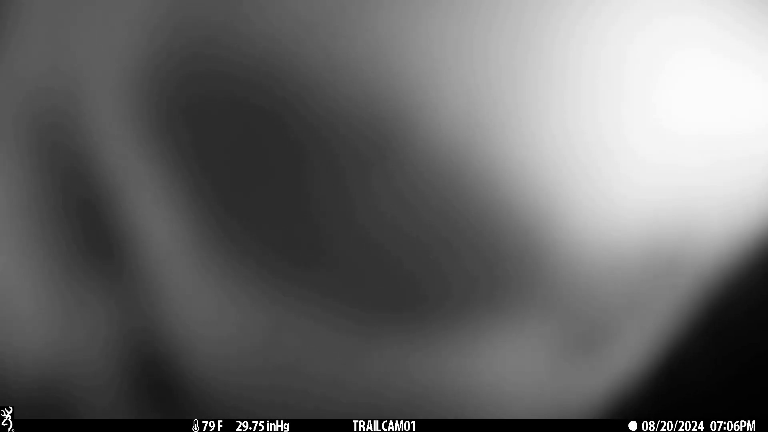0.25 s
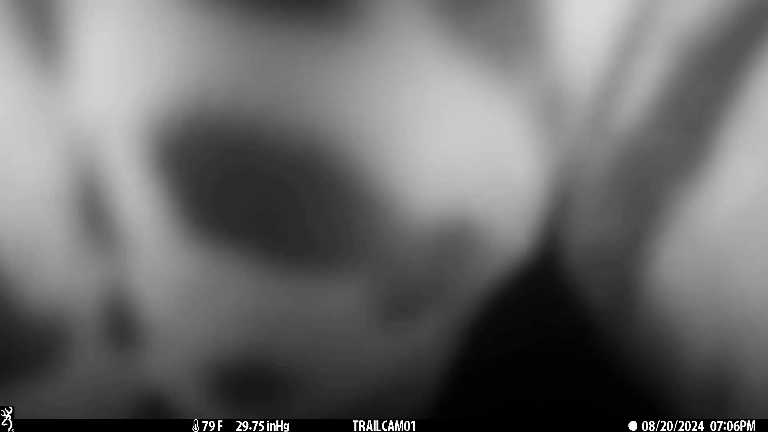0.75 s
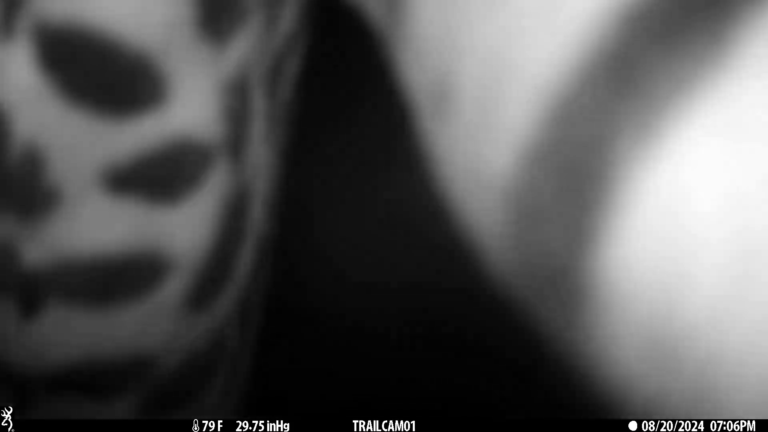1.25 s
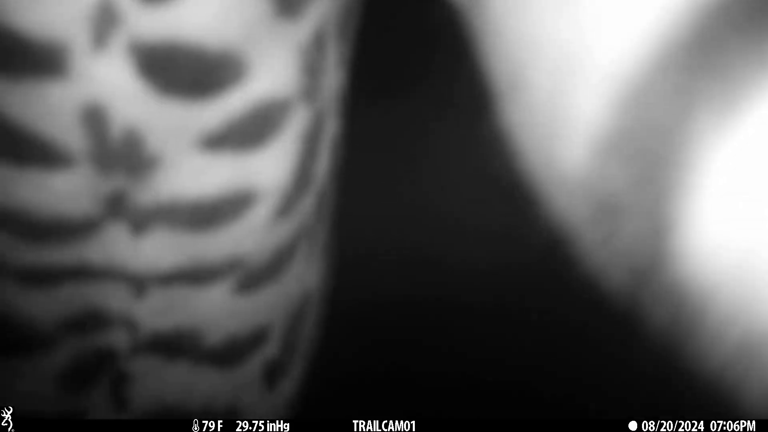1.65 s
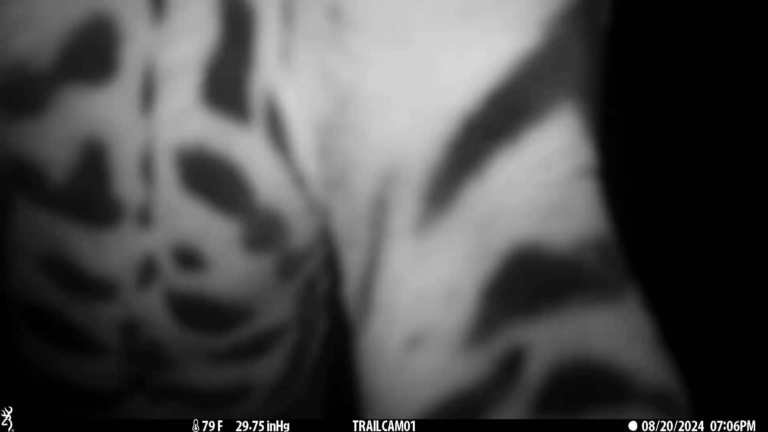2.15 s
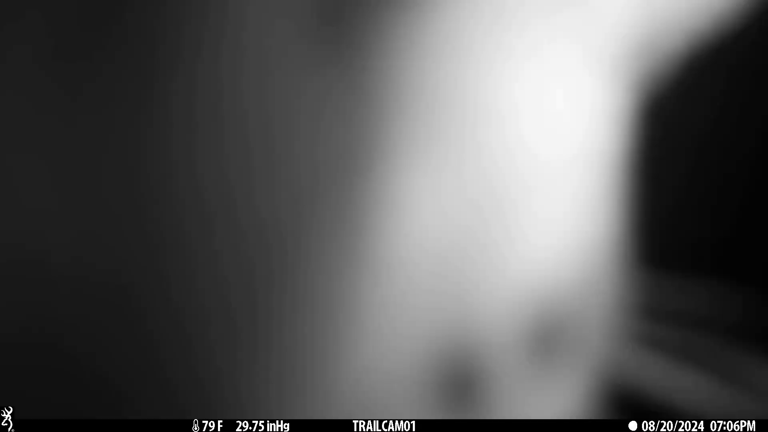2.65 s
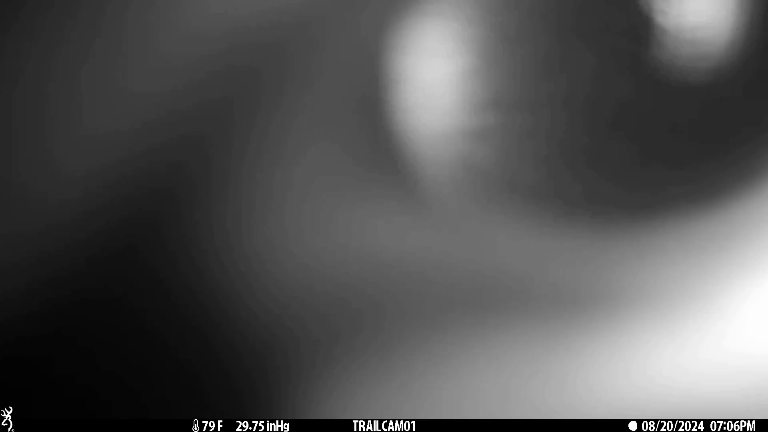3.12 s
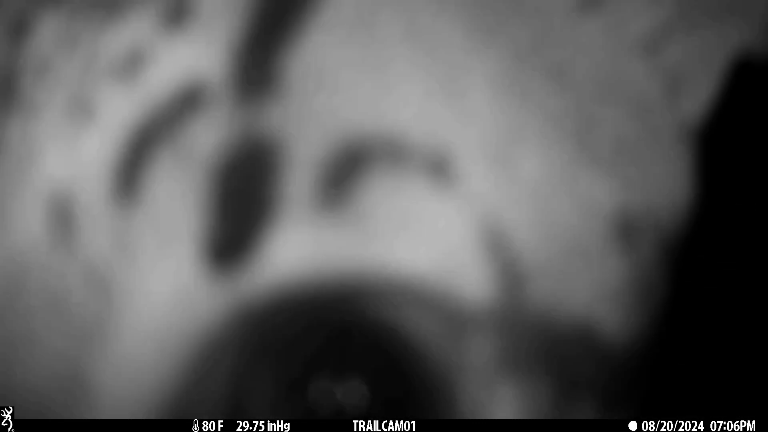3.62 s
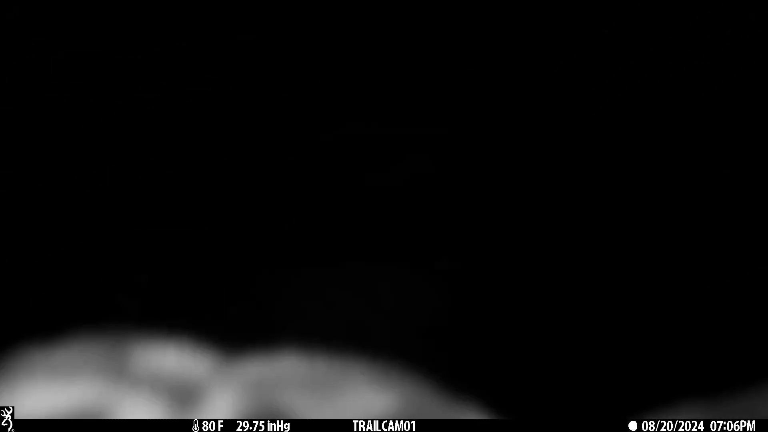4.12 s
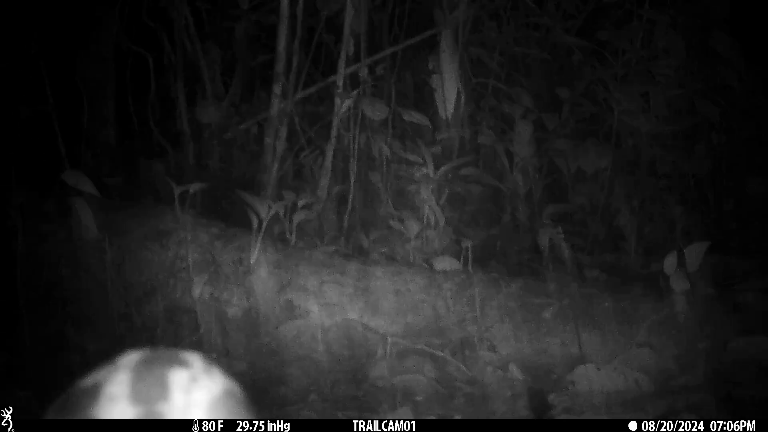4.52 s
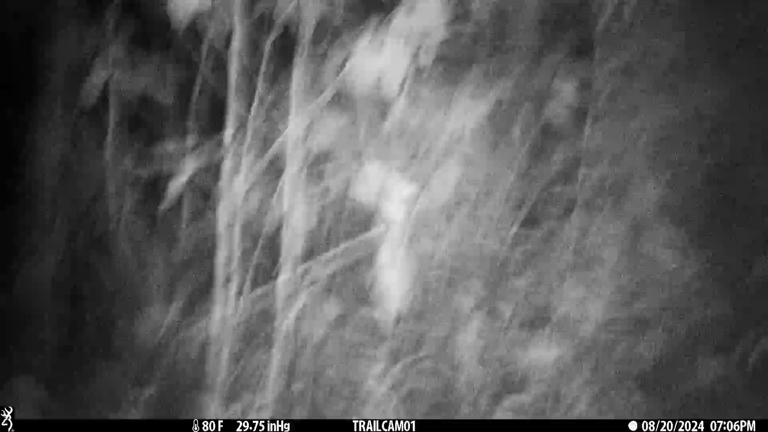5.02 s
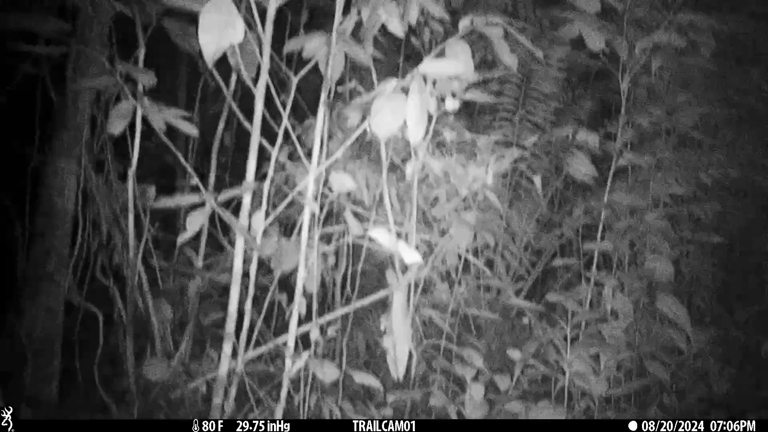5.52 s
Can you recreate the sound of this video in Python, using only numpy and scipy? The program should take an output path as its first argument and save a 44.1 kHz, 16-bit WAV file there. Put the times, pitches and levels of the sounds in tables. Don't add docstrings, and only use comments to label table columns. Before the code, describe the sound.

Close, dry rubbing, clicks and hollow knocks on a plastic shell come in bursts over a steady hiss and shrill night insects.

```python
import sys
import numpy as np
from scipy import signal
from scipy.io import wavfile
from scipy.ndimage import uniform_filter1d

SR = 44100
rng = np.random.default_rng(int(sys.argv[2]) if len(sys.argv) > 2 else 0)


def amp(db):
    return 10 ** (np.asarray(db, float) / 20)


def write(x):
    x = np.atleast_2d(x).T
    wavfile.write(sys.argv[1], SR, np.round(np.clip(x, -1, 1) * 32767).astype(np.int16))


N = 254456


def evened(x):
    return x / np.sqrt(np.mean(x ** 2) + 1e-20)


def add(mix, start_s, sound):
    part = mix[round(start_s * SR):][:len(sound)]
    part += sound[:len(part)]


def resonate(x, hz, width_hz):
    r = np.exp(-np.pi * width_hz / SR)
    pole = r * np.exp(2j * np.pi * hz / SR)
    return 2 * signal.lfilter([1 - r], [1, -pole], x).real


def ring(x, modes):
    out = 0
    for k, (hz, width_hz, db) in enumerate(modes):
        mode = resonate(resonate(x, hz, width_hz), hz, width_hz)
        out = out + (-1) ** k * amp(db) / np.sqrt(width_hz) * mode
    return out


def glide(x, hz, width_hz):
    turn = np.exp(2j * np.pi * np.cumsum(hz) / SR)
    r = np.exp(-np.pi * width_hz / SR)
    return (turn * signal.lfilter([(1 - r) ** 2], [1, -2 * r, r * r], x / turn)).real


def drift(n, size):
    return evened(uniform_filter1d(uniform_filter1d(rng.standard_normal(n), size), size))


FADE_DB, ROUND = 18, 1.41


def stroke(t, deepest_s, rise_s, fall_s, db):
    before = (deepest_s - t) / max(rise_s, .004)
    after = (t - deepest_s) / max(fall_s, .004)
    away = np.where(t < deepest_s, before, after)
    return amp(2 * (db - FADE_DB * np.minimum(away, 4) ** ROUND))


# (deepest [s], rise [s], fall [s], pressure [dB], rim re pressure [dB])
HEAD_RUBS = [(.4, 0.052, 0.066, -25.5, -9), (0.498, 0.048, 0.039, -26.5, -3.5),
             (.575, 0.05, 0.022, -30.5, -7), (.606, 0.019, .045, -24.5, -5), (.68, 0.16, 0.15, -32.5, -5),
             (1.02, 0.089, 0.024, -45.5, 8), (1.21, 0.059, 0.17, -34, -11), (1.27, 0.013, 0.036, -22.5, -8),
             (1.308, 0.0091, 0.032, -29.5, -3), (1.391, 0.021, 0.048, -17, -8),
             (1.418, 0.033, 0.022, -23, 0.5), (1.467, 0.025, .02, -23, -16),
             (1.492, 0.0083, 0.033, -42, -25), (1.956, 0.065, 0.05, -32, -5.5)]
FLANK_RUBS = [(2.98, 0.018, 0.053, -33.5, -5), (3.122, 0.01, 0.063, -33, 3),
              (3.951, 0.075, 0.047, -31, -6.5), (4.537, 0.0097, 0.017, -28, -4),
              (4.57, 0.013, 0.021, -35, -11), (4.65, 0.18, 0.18, -32.5, -2.5),
              (5.058, 0.017, .02, -25.5, -9), (5.091, 0.11, 0.071, -29.5, -5.5),
              (5.13, 0.11, 0.12, -30.5, -1.5), (5.373, 0.032, 0.019, -22, -2),
              (5.56, 0.048, 0.076, -19, -3), (5.66, 0.061, 0.18, -34, -5.5), (5.76, 0.14, 0.098, -33, -2)]
# (frequency [Hz], width [Hz], level [dB])
SHELL_MODES = [(2200, 350, -5.5), (2694, 1700, -6), (3220, 200, -7), (3587, 180, -5.5), (6460, 67, -20.5)]
# (frequency [Hz], width [Hz], level [dB])
RIM_MODES = [(4060, 430, 0), (4400, 400, -6), (5420, 3400, -12.5)]
# (frequency [Hz], width [Hz], level [dB])
BODY_MODES = [(1090, 410, 6), (1650, 310, 2), (670, 91, -10), (420, 64, -4.5)]
HEAD_PANEL_HZ, FLANK_PANEL_HZ, STIFFEN_HZ_PER_DB = 3170, 3053, 1.5
PANEL_DB_PER_DB = 0.36
BODY_DB, BODY_DB_PER_DB = -48, 1
RUMBLE_DB, RUMBLE_DB_PER_DB = -58.5, 1
LOOSE_S, TIGHT_DB, TIGHT_BODY_DB = 0.073, -21, -18
FUR_HZ, FUR_WIDTH_HZ, FUR_DB = 8840, 3300, -36.5
SWEEP_POWER = 1.2


def rubs():
    size = amp(2.2 * np.minimum(rng.exponential(1, N), 3))
    slips = size * rng.standard_normal(N) * (rng.random(N) < 9000 / SR)
    slips *= amp(.8 * drift(N, size=120)) / np.sqrt(uniform_filter1d(slips ** 2, size=900) + 1e-9)

    t = np.arange(0, N + 32, 32) / SR
    rows = HEAD_RUBS + FLANK_RUBS
    strokes = np.array([stroke(t, *row[:-1]) for row in rows])
    db = 10 * np.log10(strokes.sum(0) + 1e-12)
    rim = np.sqrt(amp(2 * np.array(rows)[:, -1]) @ strokes)
    lengths = np.array([(rise_s + fall_s) / .1 for _, rise_s, fall_s, *_ in rows])
    sweep = lengths ** SWEEP_POWER @ strokes
    tight = 1 - np.max([np.exp(-((t - s) / LOOSE_S) ** 2) for s, *_ in SHOVES], axis=0)
    curves = (t, db, rim, sweep, tight)
    t, db, rim, sweep, tight = (np.interp(np.arange(N) / SR, t, v) for v in curves)
    over_db = db + 33
    sweep_db = 10 * np.log10(sweep + 1e-12) + 33
    touch = 1 / (1 + amp(-2 * (db + 65)))

    panel_hz = np.where(t < FLANK_RUBS[0][0] - .5, HEAD_PANEL_HZ, FLANK_PANEL_HZ)
    panel_hz = panel_hz + STIFFEN_HZ_PER_DB * np.maximum(over_db, -20)
    shell = amp(PANEL_DB_PER_DB * np.clip(over_db - 3.5, -15, 0) - 3.0) * evened(ring(slips, SHELL_MODES))
    shell += 0.73 * evened(glide(slips, panel_hz, 370))
    body = amp(TIGHT_BODY_DB * tight) * ring(slips, BODY_MODES[:1] + BODY_MODES[2:])
    body -= ring(slips, BODY_MODES[1:2])
    rumble = resonate(resonate(slips, 122, 290), 122, 290)
    fur = evened(ring(rng.standard_normal(N), [(FUR_HZ, FUR_WIDTH_HZ, 0)]))

    parts = amp(db - 1.5) * shell
    parts += amp(-1.9) * rim * evened(ring(slips, RIM_MODES))
    parts += amp(BODY_DB + BODY_DB_PER_DB * over_db) * evened(body)
    parts += amp(RUMBLE_DB + RUMBLE_DB_PER_DB * over_db + TIGHT_DB * tight) * evened(rumble)
    parts += amp(FUR_DB - 34.5 + 0.64 * sweep_db) * fur
    return parts * touch


# (time [s], peak [dB], pitch [Hz], length [s])
SNAGS = [(0.388, -14, 3220, 0.0089), (0.425, -12, 3200, 0.0045), (0.4932, -18, 3300, 0.0074),
         (0.5133, -5, 3420, 0.0071), (0.572, -28, 2980, 0.0053), (0.597, -11, 3380, 0.0044),
         (0.6024, -9, 3170, 0.0096), (0.62, -24, 2900, 0.006), (1.168, -22, 3180, 0.012),
         (1.197, -16.5, 3180, 0.0098), (1.224, -22, 3150, .005), (1.265, -23, 3330, 0.006),
         (1.272, -12, 3220, 0.0086), (1.293, -5, 3220, 0.0069), (1.3012, -2, 3300, 0.0056),
         (1.385, -11, 3350, 0.0028), (1.3934, -4, 3400, 0.0044), (1.4006, -1, 3380, 0.011),
         (1.416, -3, 2960, 0.011), (1.4574, 2.5, 3950, 0.0023), (1.4605, 4, 3420, 0.006),
         (1.4675, -5, 3700, 0.0078), (1.492, -20, 3190, 0.01), (1.505, -28, 1100, 0.0036),
         (1.6244, -20.5, 3300, 0.0075), (1.664, -25.5, 2980, 0.0074), (1.929, -16.5, 3230, 0.0074),
         (1.939, -15, 3180, 0.0065), (1.956, -15.5, 3600, 0.017),
         (2.933, -18.5, 4160, 0.0035), (2.971, -21.5, 4150, 0.005), (3.115, -23, 2700, 0.015),
               (3.124, -20, 4160, 0.0068), (3.267, -28, 3120, 0.022), (3.898, -31, 1130, 0.087),
               (3.92, -22, 3480, 0.019), (3.931, -29, 1110, 0.034), (3.94, -18, 3300, 0.0098),
               (4.5098, -13.5, 4180, 0.0054), (4.514, -12.5, 2880, 0.01), (4.5234, -12, 3140, 0.0064),
               (4.5302, -13, 2200, 0.0046), (4.5316, -7, 3240, 0.011), (4.552, -10.5, 3800, 0.013),
               (4.556, -22, 1150, .012), (4.567, -26, 4100, 0.01), (4.586, -24, 4200, .008),
               (4.739, -23, 3200, 0.012), (5.0525, -9.5, 3270, 0.0073), (5.0547, -16, 3170, 0.005),
               (5.126, -17, 3220, 0.0073), (5.139, -15.5, 2650, 0.0056), (5.269, -27, 4000, .006),
               (5.351, -22, 2470, 0.0054), (5.375, -15.5, 4060, 0.015)]
SNAG_BODY_DB, SNAG_BODY_DB_PER_DB = -33.5, 0.87
LIGHT_DB_PER_DB = 0.24


def snag(start_s, db, hz, length_s, chance):
    t = np.arange(len(chance)) / SR
    fade_db = -30 * (t / max(length_s, .002)) ** 1.4
    burst = chance * (1 - np.exp(-t / .0006)) ** 2 * amp(fade_db)
    burst[SR // 1000] += 4.5
    favoured = evened(ring(burst, [(hz, 0.19 * hz, 0)]))
    shell = evened(ring(burst, SHELL_MODES + RIM_MODES))
    shell += 1.95 * amp(-LIGHT_DB_PER_DB * (db + 8)) * favoured
    body = ring(burst, BODY_MODES)
    body_db = SNAG_BODY_DB + SNAG_BODY_DB_PER_DB * (db + 11)
    sound = amp(db - 2.84) * shell / abs(shell).max() + amp(body_db) * body / abs(body).max()
    return start_s - .001, sound


# (time [s], peak [dB], pitch factor [1], ring time [s])
KNOCKS = [(.59, -46, 1.1, .05), (1.263, -34, 1.2, 0.034), (1.38, -25.5, 0.95, 0.045),
          (1.419, -31.5, 0.88, 0.091), (1.457, -15.5, 0.98, 0.011), (1.499, -48, 0.89, 0.025),
          (4.506, -35.5, 1.06, 0.062), (4.571, -43.5, 0.79, 0.043), (4.68, -48, 0.86, .04),
          (4.739, -44, 0.476, 0.047), (5.049, -16, 0.98, 0.025), (5.129, -53, 1, 0.027),
          (5.26, -42, 0.92, 0.09), (5.353, -20.5, 1.12, 0.018), (5.367, -17.5, 0.98, 0.019)]
# (frequency [Hz], level [dB], share of ring time [1])
BOX_MODES = [(466, -4, 2.7), (652, -3.5, 1.7), (920, -6, 1.96), (1214, 1, 0.94)]


def knock(start_s, db, pitch, t60_s):
    t = np.arange(SR // 5) / SR
    box = np.zeros(len(t))
    for hz, mode_db, share in BOX_MODES:
        box += amp(mode_db - 60 * t / (t60_s * share)) * np.sin(2 * np.pi * hz * pitch * t)
    return start_s, amp(db) * box * (1 - np.exp(-t / 0.0017))


# (time [s], peak [dB], pitch [Hz])
SHOVES = [(.42, -63, 60), (.52, -45, 70), (.59, -62, 50), (1.16, -53, 50), (1.263, -58, 60),
          (1.381, -52, 70), (1.418, -50, 60), (1.457, -35, 70.5), (1.499, -43, 89), (2.988, -59, 80),
          (4.5073, -25, 138), (4.571, -58, 39.6), (4.681, -44.5, 109), (5.049, -42, 50.4), (5.129, -49, 50),
          (5.261, -46, 70), (5.353, -53, 60), (5.369, -40.5, 60)]


def shove(start_s, db, hz):
    t = np.arange(SR // 5) / SR
    push = np.sin(np.pi * np.minimum(t * hz * 0.94, 1)) ** 2
    return start_s, -amp(db) * np.sin(2 * np.pi * hz * t) * push


CRICKET_HZ, CRICKET_DB = 5666, -52
CRICKET_FIRST_S, CRICKET_EVERY_S, CRICKET_SINGS_S = 1.91, 1.6, .27


def cricket():
    t = np.arange(N) / SR - CRICKET_FIRST_S
    sings = (t % CRICKET_EVERY_S < CRICKET_SINGS_S) & (t > 0) & (t < 2 * CRICKET_EVERY_S)
    singing = uniform_filter1d(sings * 1., size=900)
    whistle = np.sin(2 * np.pi * CRICKET_HZ * t)
    whistle += .4 * evened(ring(rng.standard_normal(N), [(CRICKET_HZ, 25, 0)]))
    return amp(CRICKET_DB) * singing * whistle


# (frequency [Hz], width [Hz], level [dB], throb rate [1/s], throb
# depth [dB])
INSECTS = [(4170, 57, -53, 30, 3), (4790, 240, -48.5, 45, -1.2), (6110, 560, -54, 58, -3),
           (6496, 160, -49.5, 84, -3.5), (6660, 64, -48.5, 11, 1.5), (7726, 405, -52.5, 170, -1),
           (10540, 200, -71, 50, 0.5), (11630, 270, -77, 50, -4)]
# (time [s], swell [dB])
CHOIR = [(0.0, -15), (0.45, -33), (0.66, 1.5), (0.99, -3), (1.2, 8), (1.49, 4.5), (1.91, -4), (2.2, 4.5),
         (2.44, 6), (2.97, -2.5), (3.54, 4.5), (3.78, 2.1), (4.92, 1.8), (5.11, 7), (5.45, 2), (5.77, 3.5)]
HIGH_FOLLOW, HIGH_START_DB, HIGH_DB_PER_S = 0.11, -3.5, 0.7


def insects():
    t, out = np.arange(N) / SR, np.zeros(N)
    low_db = np.interp(t, *np.transpose(CHOIR))
    high_db = HIGH_START_DB + HIGH_DB_PER_S * t + HIGH_FOLLOW * low_db
    for hz, width_hz, db, rate_hz, depth_db in INSECTS:
        song = evened(resonate(resonate(rng.standard_normal(N), hz, width_hz), hz, width_hz))
        wander_hz = rate_hz * (1 + 0.191 * drift(N, size=4000))
        throb = np.sin(2 * np.pi * np.cumsum(wander_hz) / SR)
        swell_db = low_db if hz < 5000 else high_db
        out += amp(db + depth_db * throb + swell_db) * song
    return out


# (frequency [Hz], density [dB per Hz])
HISS = [(20, -42), (60, -27), (226, -19), (688, -5.5), (1250, -2.5), (2400, -3.5), (4200, -3.5),
        (4900, -5.5), (5900, -13), (6900, -10), (7220, -16), (8000, -18), (8300, -33), (10500, -33.5)]
# (time [s], strength [dB])
BREEZE = [(0.0, 3), (0.56, 6), (0.98, 0.9), (1.3, 0.7), (2.19, -0.5), (2.75, 2), (3.46, 1.1), (3.7, 0.5),
          (4.42, -0.9), (4.64, .6), (5.05, -0.8), (5.2, 0.5), (5.56, 1.2), (5.77, -0.5)]
HISS_DB, UPPER_FOLLOWS = -54, 0.13


def hiss():
    frames, hz = N // 256 + 5, np.fft.rfftfreq(1024, 1 / SR)
    a, b, patches = rng.standard_normal((frames, 513, 3)).T
    patches = evened(uniform_filter1d(uniform_filter1d(patches, 10, 0), 10, 1))
    t = np.arange(frames) * 256 / SR
    f, colour_db = np.transpose(HISS)
    upper = np.clip(np.log2((hz + 1) / 2400) * 4.5 + .5, 0, 1)[:, None]
    swell_db = (1 - (1 - UPPER_FOLLOWS) * upper) * np.interp(t, *np.transpose(BREEZE))
    steady = (hz >= 4600)[:, None]
    field_db = np.interp(np.log(hz + 1), np.log(f + 1), colour_db)[:, None]
    field_db = field_db + 0.7 * patches + np.where(steady, 0, swell_db)
    return signal.istft((a + 1j * b) * amp(field_db + HISS_DB), nperseg=1024, noverlap=768)[1][:N]


def scene():
    cat = rubs()
    snags = SNAGS
    for row, chance in zip(snags, rng.standard_normal((len(snags), SR // 20))):
        add(cat, *snag(*row, chance))
    for row in KNOCKS:
        add(cat, *knock(*row))
    for row in SHOVES:
        add(cat, *shove(*row))
    return np.tile(cat + cricket() + insects() + hiss(), (2, 1))


def thin_treble(x):
    hz, _, z = signal.stft(x, SR, nperseg=1024)
    power = abs(z) ** 2
    power_db = 10 * np.log10(uniform_filter1d(power, size=5, axis=0) + 1e-20)
    loud_db = 10 * np.log10(uniform_filter1d(power.sum(0), size=5) + 1e-20)
    top = np.clip((hz[:, None] - 8300) / 2600, 0, 1)
    bar_db = np.median(power_db, axis=1)[:, None] - 9 + 7.5 * np.sqrt(top)
    bar_db = bar_db + .6 * top ** 2 * (loud_db - np.median(loud_db))
    return signal.istft(z * ((power_db > bar_db) | (top == 0)), SR, nperseg=1024)[1][:N]


def low_pass(x):
    return signal.sosfilt(signal.butter(12, 15620, fs=SR, output="sos"), x)


# (frequency [Hz], width [Hz])
NOTCHES = [(5500, 520), (11025, 1140)]
# (frequency [Hz], width [Hz], level [dB])
SPLASH = [(10700, 530, 31.5), (13500, 300, 23), (14450, 200, 28)]
EDGE_HZ = 12000


def record(dry):
    limited = dry[0] / (1 + abs(dry[0] / .86) ** 8) ** (1 / 8)
    lowpass = signal.firwin(255, EDGE_HZ, window=("kaiser", 7), fs=SR)
    x = signal.oaconvolve(limited, lowpass, "same")
    for hz, width_hz in NOTCHES:
        x = signal.lfilter(*signal.iirnotch(hz, hz / width_hz, SR), x)
    x = thin_treble(x) + ring(dry[0] - limited, SPLASH)
    level_db = 10 * np.log10(abs(uniform_filter1d(x ** 2, size=2000)) + 1e-12)
    sag_db = .056 * np.maximum(level_db + 35, 0)
    mix = np.array([x * amp(-sag_db), x])
    return low_pass(mix)


dry = scene()
out = record(dry)
write(out)
```